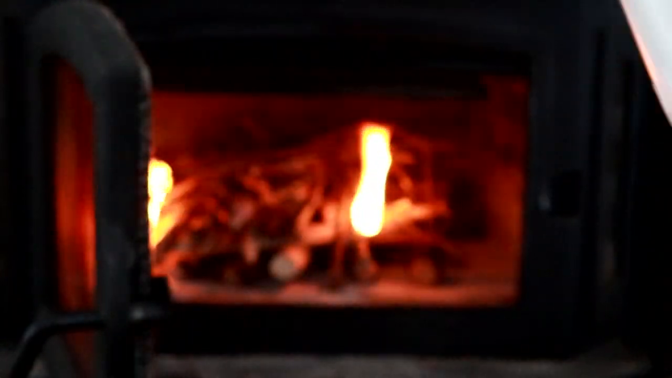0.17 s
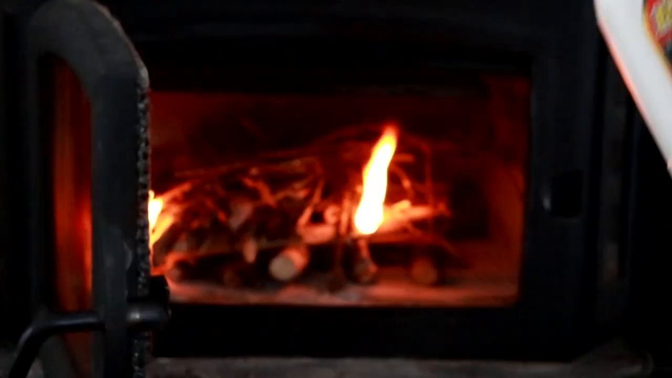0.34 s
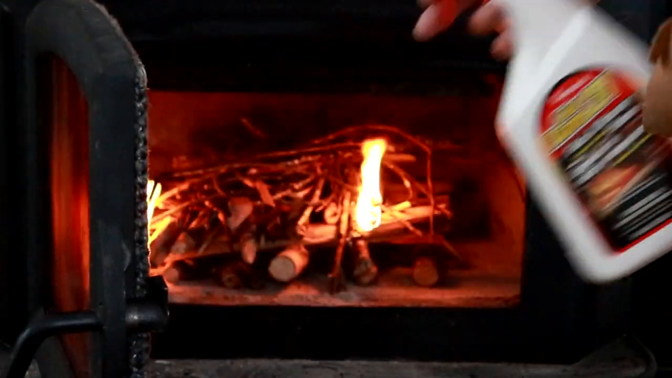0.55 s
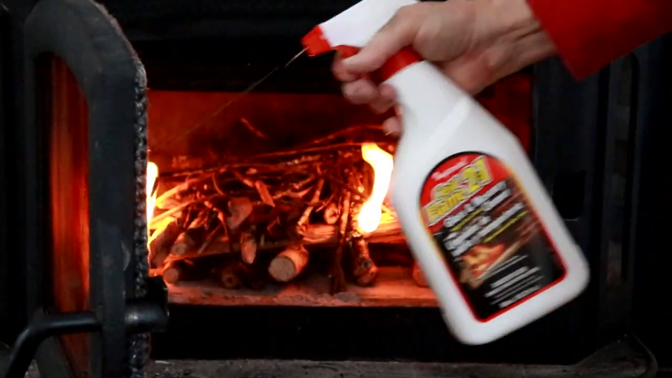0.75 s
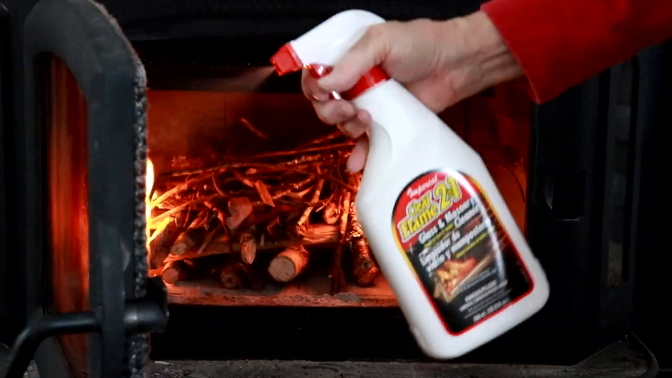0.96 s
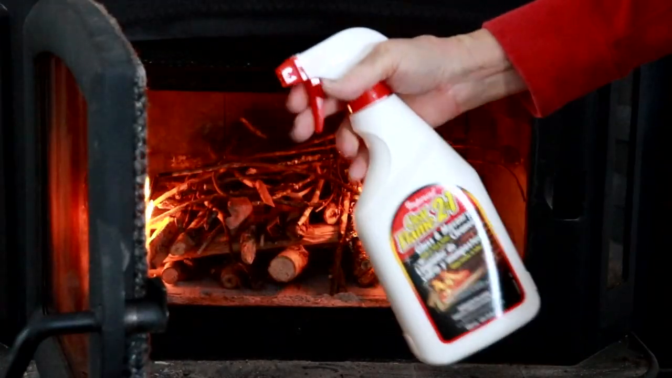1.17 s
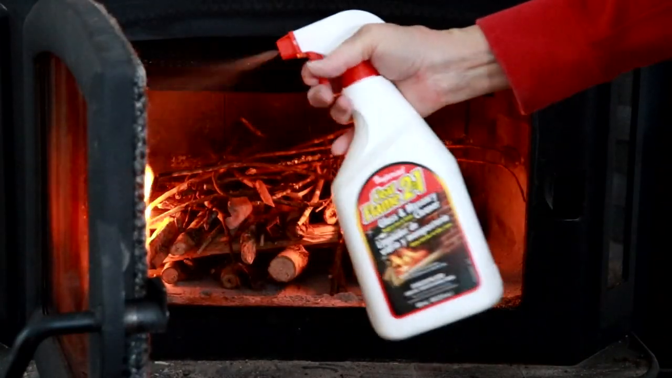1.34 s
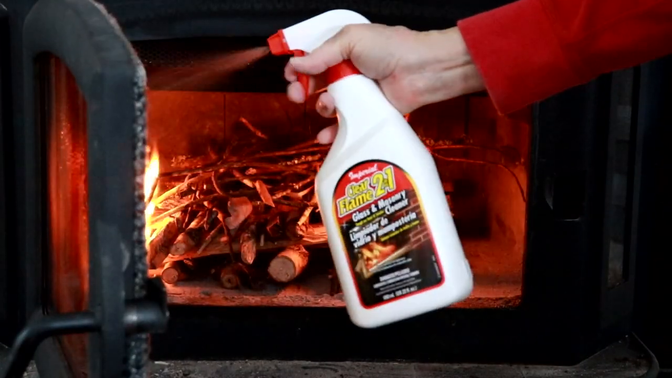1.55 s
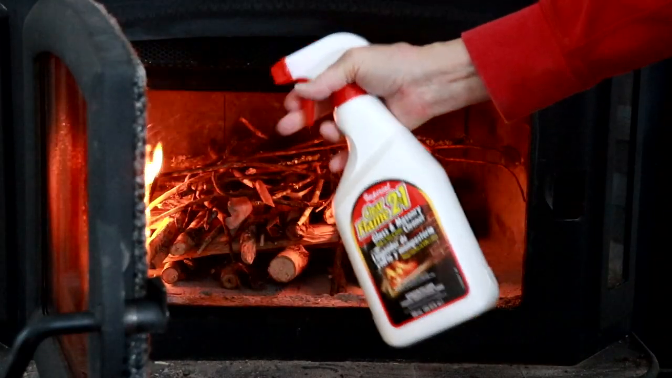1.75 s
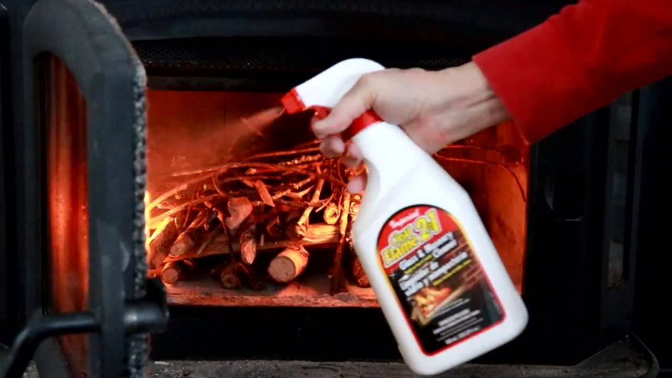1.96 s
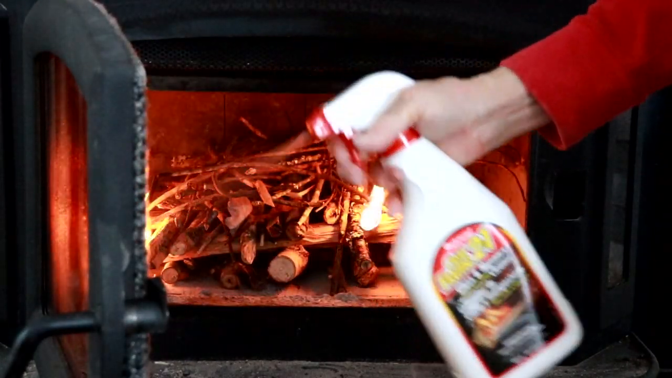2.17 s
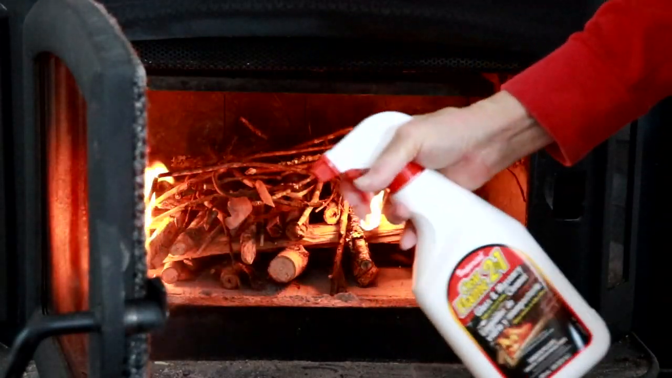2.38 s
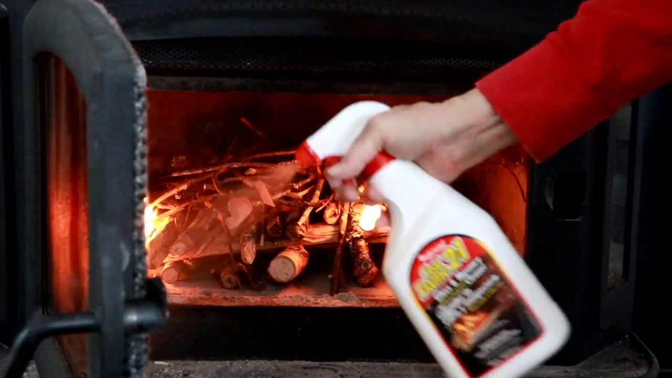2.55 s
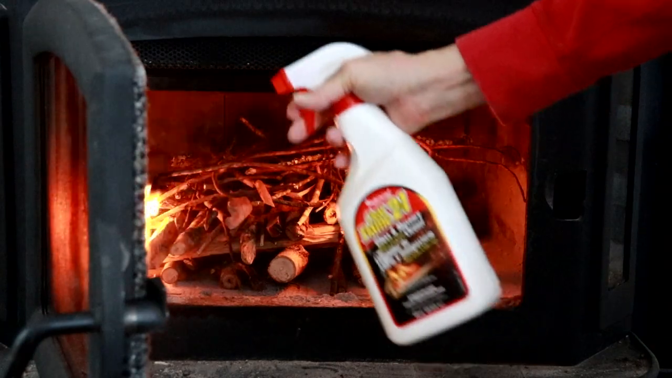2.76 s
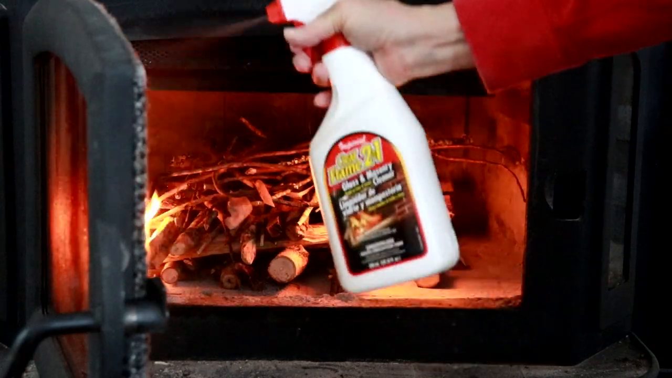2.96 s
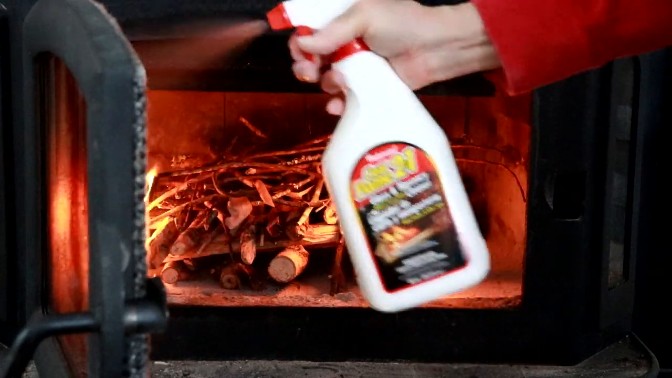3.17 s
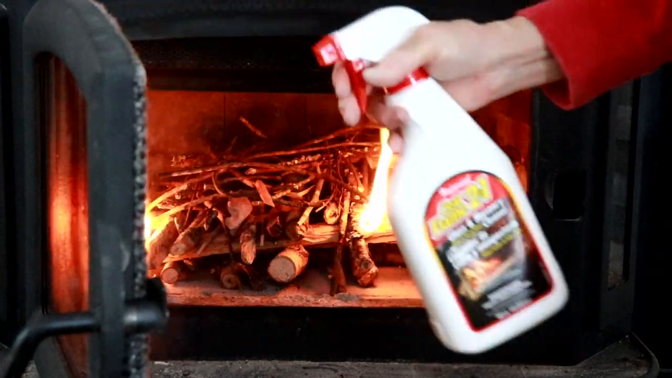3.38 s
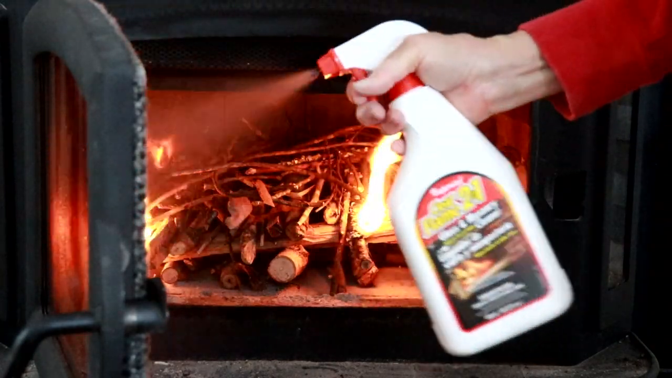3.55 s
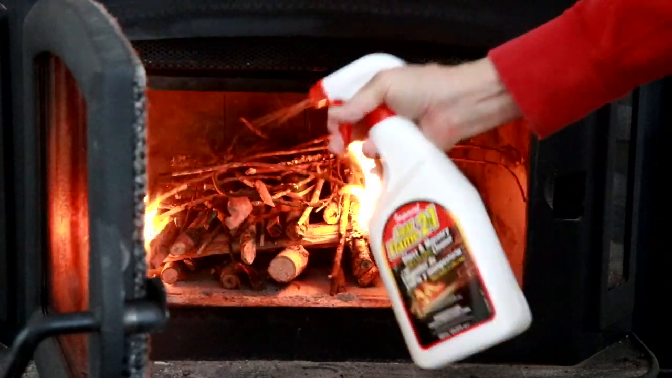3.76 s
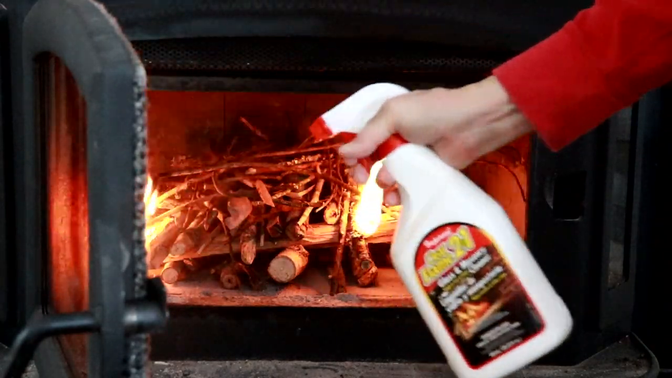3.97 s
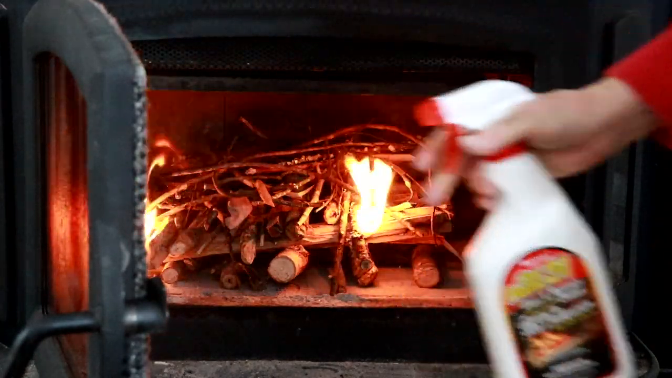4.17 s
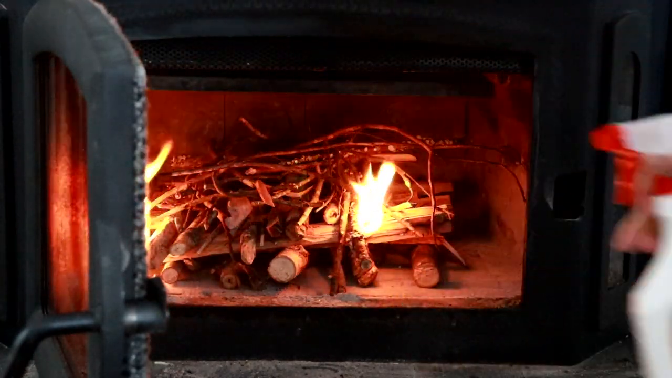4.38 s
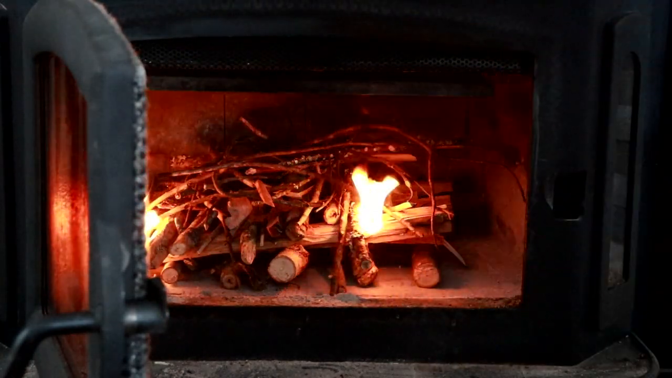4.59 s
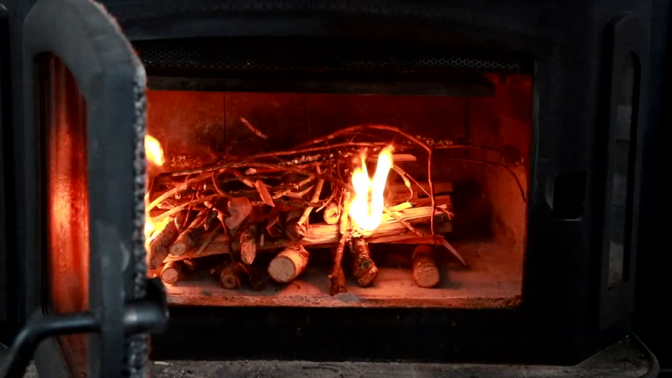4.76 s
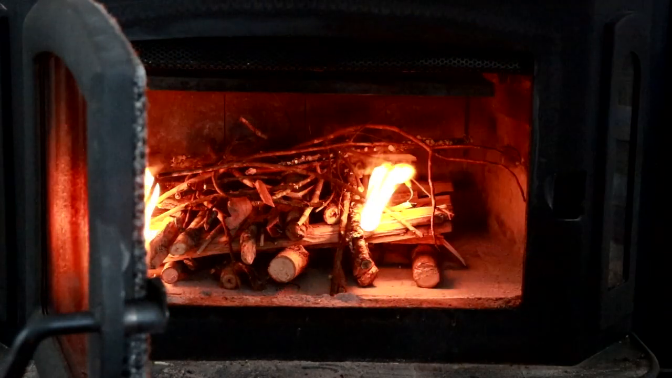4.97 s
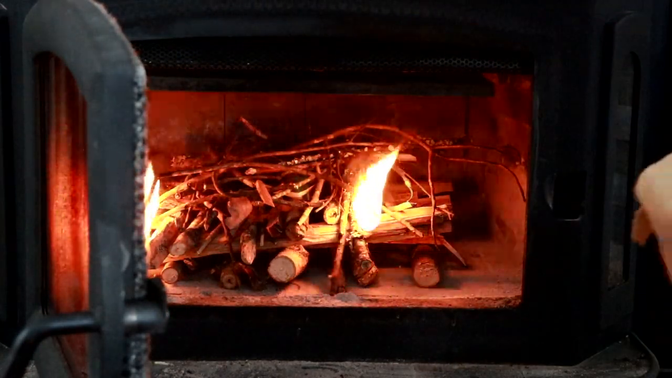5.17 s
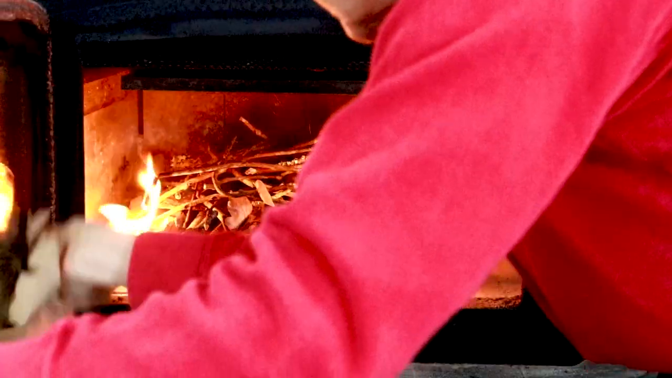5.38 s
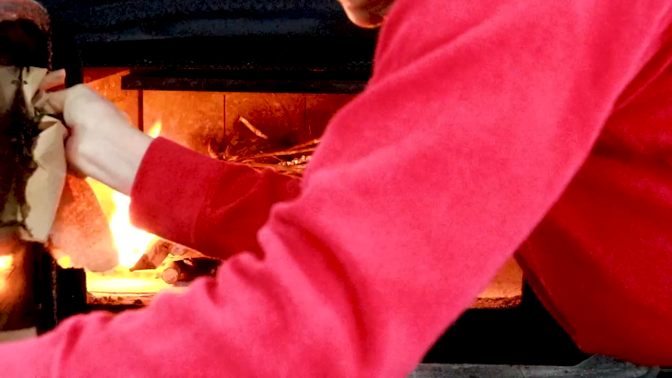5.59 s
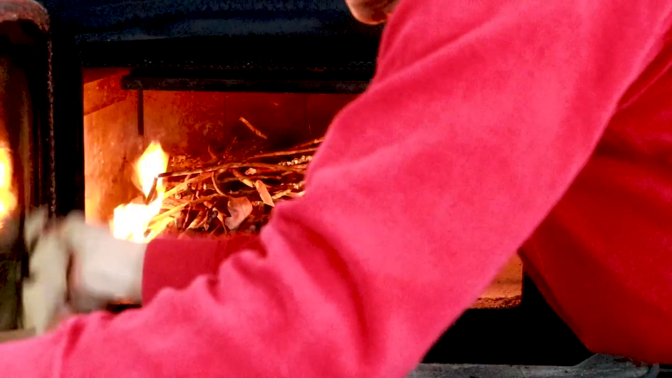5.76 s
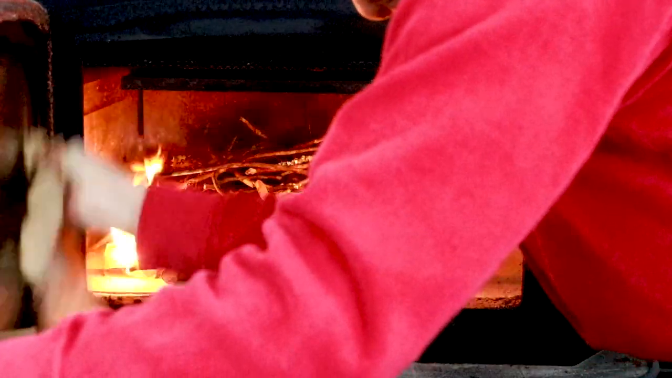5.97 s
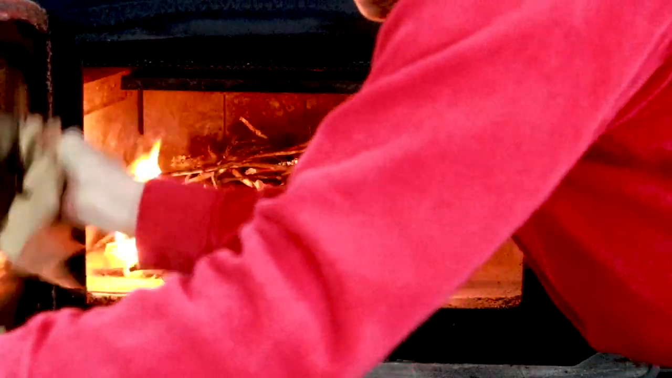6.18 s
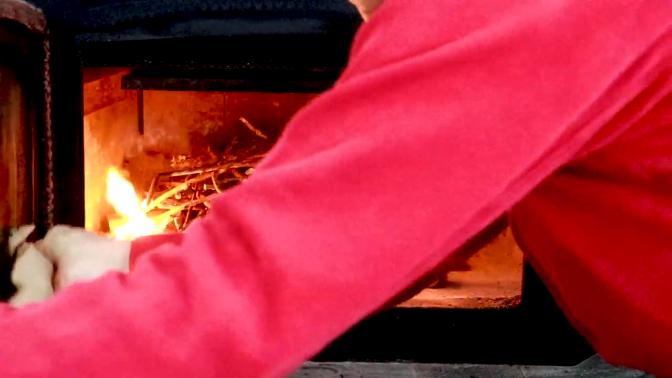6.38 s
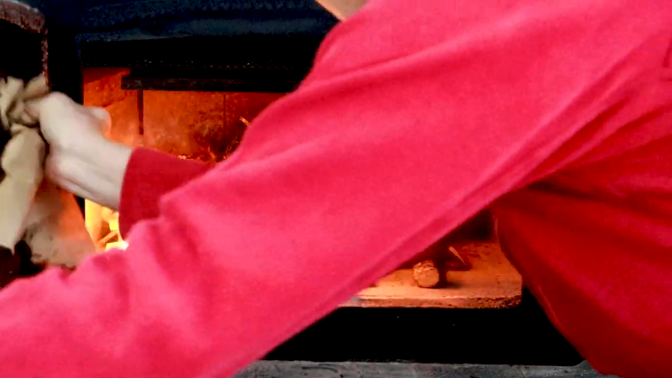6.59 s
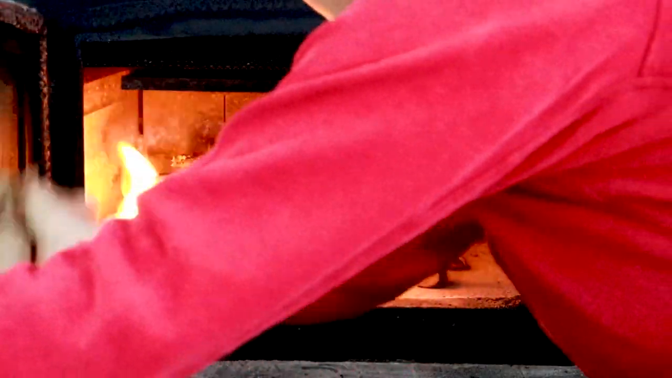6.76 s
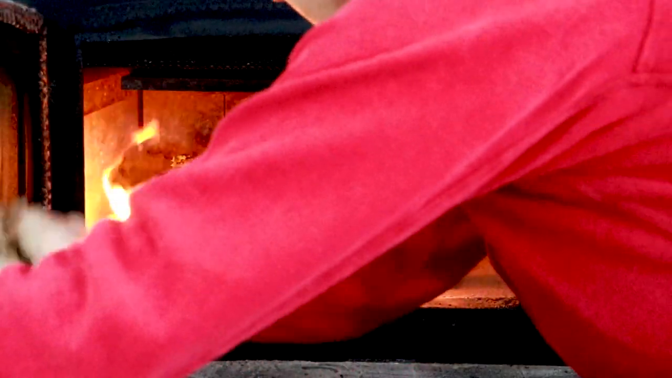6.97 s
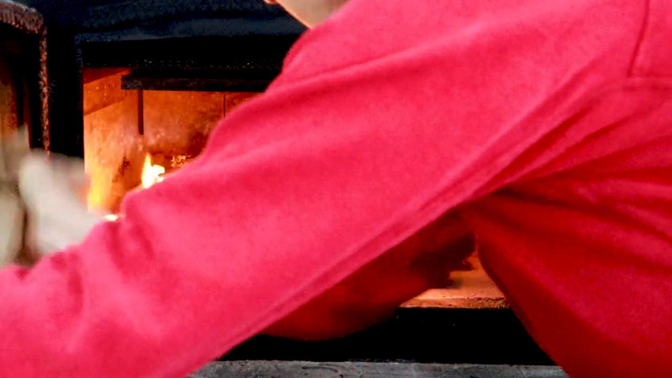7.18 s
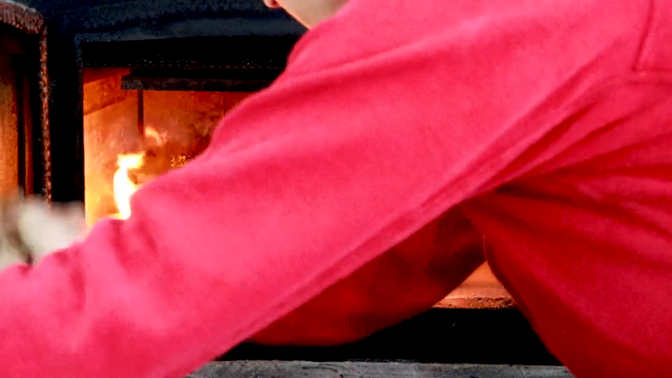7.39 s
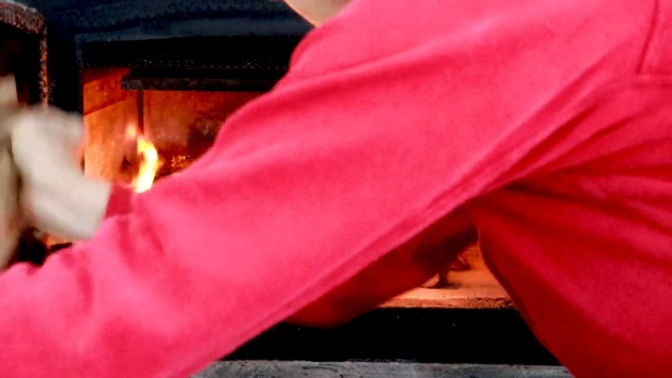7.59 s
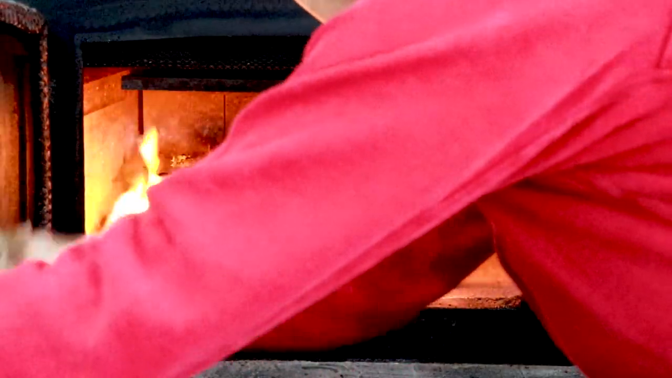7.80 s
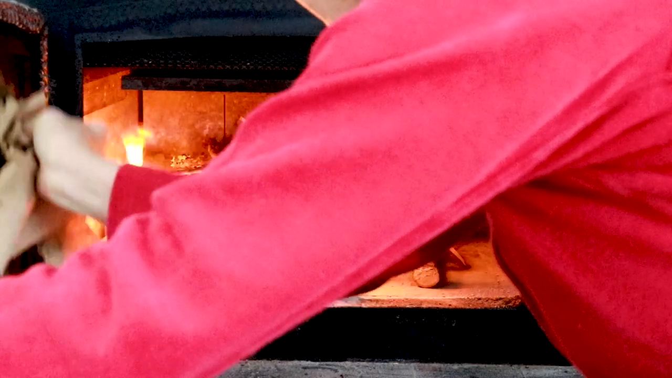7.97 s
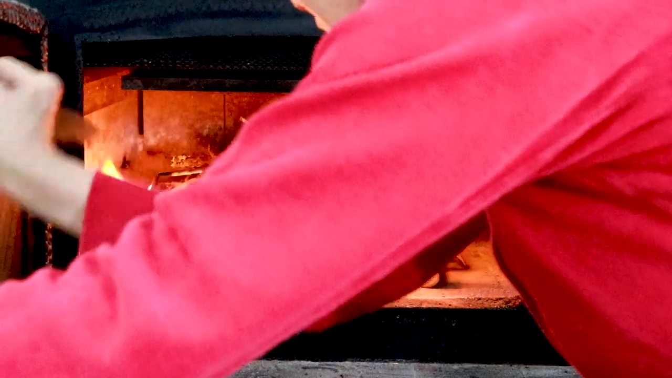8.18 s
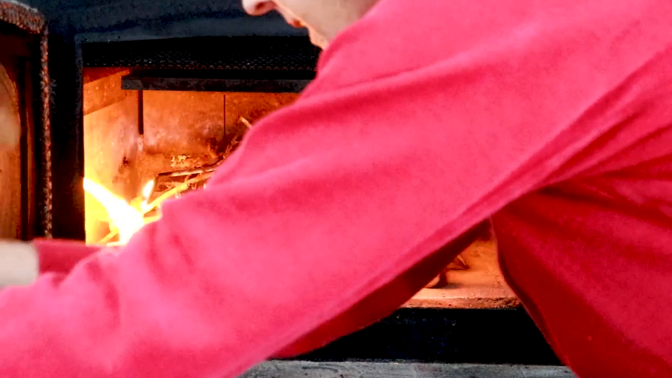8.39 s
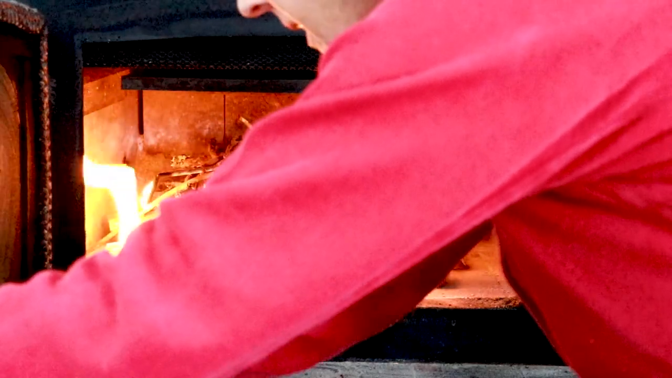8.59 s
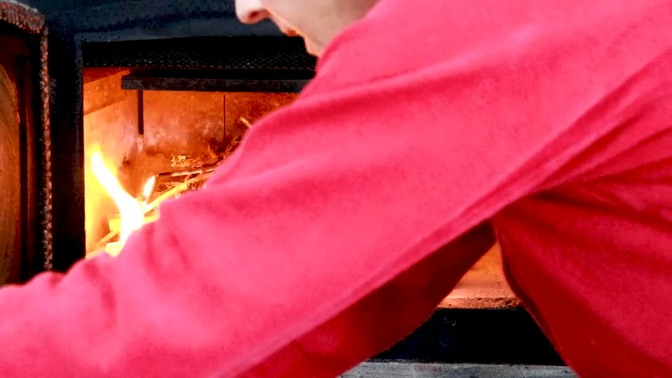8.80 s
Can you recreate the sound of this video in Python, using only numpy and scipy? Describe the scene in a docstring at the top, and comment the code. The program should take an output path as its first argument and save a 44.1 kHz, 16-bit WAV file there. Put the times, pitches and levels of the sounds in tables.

```python
"""Spraying and wiping a stove door

The glass door of a wood stove is cleaned in a small room with a soft draught and a faint hum.
A trigger bottle snaps and sputters as it primes, then gives eight puffs of mist between clicks.
Dull knocks and bumps fall early on; later a cloth rubs briskly back and forth on the wet glass.
Shaped noise makes the air, spray and rubbing; resonances colour the clicks, knocks and bottle.
"""
import sys
import numpy as np
from scipy import signal
from scipy.fft import rfft, irfft, next_fast_len
from scipy.io import wavfile
from scipy.ndimage import uniform_filter1d, map_coordinates

SR = 44100
rng = np.random.default_rng(int(sys.argv[2]) if len(sys.argv) > 2 else 0)


def wav_out(sig):
    """Save sig, one row per channel (or a flat mono array), as 16-bit PCM at SR to the path in sys.argv[1]."""
    wavfile.write(sys.argv[1], SR, np.round(np.clip(np.atleast_2d(sig).T, -1, 1) * 32767).astype(np.int16))


N = 389844
TIME = np.arange(N) / SR

# Squeezes of the trigger; click levels are before a trim:
# pulled t/s, let go t/s, pull click level/dB, its centre f/Hz, release click level/dB, mist level/dB
SQUEEZES = [(1.6238, 1.845, -24.5, 7370, -25.5, -33.5), (1.931, 2.1544, -24.5, 2320, -27, -32),
            (2.2603, 2.4906, -21, 1740, -29, -33), (2.574, 2.8, -22.5, 2520, -27, -32.5),
            (2.8944, 3.124, -22, 6860, -36.5, -33), (3.22, 3.449, -21, 6200, -31, -32.5),
            (3.53, 3.7505, -25, 1750, -28.5, -31.5), (3.863, 4.095, -19.5, 6300, -28.5, -34)]
# Resonances of the bottle's hollow body: f/Hz, width/Hz, level/dB
BOTTLE = [(1217, 40, 5.5), (1040, 250, -10.5)]


def amp(db):
    """Turn decibels into a plain factor."""
    return 10 ** (np.asarray(db) / 20)


def unit(x):
    """Scale to an average (rms) level of 1."""
    return x / np.sqrt(np.mean(x ** 2) + 1e-20)


def along(points, hz):
    """Read a curve through (f/Hz, value) points on a log frequency axis."""
    f, v = np.transpose(points)
    return np.interp(np.log(hz + 1), np.log(f + 1), v)


def wobble(rate):
    """A smooth random curve through `rate` random points a second."""
    points = rng.standard_normal(int(N * rate / SR) + 4)
    return map_coordinates(points, [TIME * rate])


def filtered(x, response):
    """Multiply the spectrum of x by a response that depends on frequency."""
    n = x.shape[-1]
    padded = next_fast_len(n + 8192)
    spectrum = rfft(x, padded) * response(np.fft.rfftfreq(padded, 1 / SR))
    return irfft(spectrum, padded)[..., :n]


def coloured(x, spectrum):
    """Shape x by a curve of (f/Hz, relative level/dB), then set it to rms 1."""
    return unit(filtered(x, lambda hz: amp(along(spectrum, hz))))


def resonance(f, hz, width):
    """One resonance, which rings only after it is struck."""
    return 1j * f * width / (hz * hz - f * f + 1j * f * width)


def resonant(x, modes, direct_db):
    """Send x through a set of resonances, beside a direct path."""
    def response(f):
        ringing = sum(amp(db) * resonance(f, hz, width) for hz, width, db in modes)
        return amp(direct_db) + ringing
    return filtered(x, response)


def add(track, s, sound):
    """Mix a sound into the track at s seconds."""
    start = round(s * SR)
    track[..., start:start + sound.shape[-1]] += sound[..., :N - start]


def pair(alike, size=N):
    """White noise at two microphones; alike is 1 for the same noise and 0 for unrelated noise."""
    mid, side = rng.standard_normal((2, size))
    turn = np.arccos(np.clip(alike, -1, 1)) / 2
    return np.cos(turn) * mid + np.sin(turn) * np.array([side, -side])


def grains(rate, spread_db, bed_db, alike):
    """Tiny impacts of uneven size, about `rate` a second, on a bed of smooth noise."""
    unevenness = np.clip(rng.standard_normal(N), -2, 2)
    sizes = (rng.random(N) < rate / SR) * amp(spread_db * unevenness)
    return unit(sizes * pair(alike)) + amp(bed_db) * pair(alike)


def patchy(x, depth_db):
    """Let the colour shift by chance over some hundred Hz and some hundredths of a second."""
    z = signal.stft(x, nperseg=512)[2]
    field = rng.standard_normal(z.shape[1:])
    field = uniform_filter1d(field, size=5, axis=0)
    field = uniform_filter1d(field, size=5, axis=1)
    shifted = z * amp(depth_db * unit(field))
    return unit(signal.istft(shifted, nperseg=512)[1][:, :N])


def placed(x, lag_ms, right_db):
    """Place a source: lag_ms delays the left against the right; right_db lifts the right over the left."""
    side = np.array([[-.5], [.5]])
    return filtered(x, lambda hz: amp(side * right_db) * np.exp(2j * np.pi * hz * side * lag_ms / 1000))


def swell(t, middle, width):
    """The bell of one push of the hand: 1 at its middle, with soft skirts."""
    return (1 + ((t - middle) / width) ** 2 / 3) ** -1.6


def swells(rows):
    """Add rows of (t/s, half-width/s, level/dB, ..) in power: one gain curve for each level column."""
    power = sum(np.outer(amp(dbs), swell(TIME, s, width)) ** 2 for s, width, *dbs in rows)
    return np.sqrt(power)


def gate(start, edge):
    """A soft step from 0 to 1, halfway up at the start time."""
    return .5 + .5 * np.tanh((TIME - start) / edge)


def background():
    """The room's air and the stove's draught as noise more alike in the bass, with a faint wavering hum."""
    # Room and draught: f/Hz, relative level/dB per Hz
    air_colour = [(15, -49), (25, -24), (55, -4), (190, -7), (394, -7.5), (463, -6), (503, -5.5), (624, -7),
                  (714, -8.5), (1040, -7), (1790, -9), (1940, -9), (8140, -15), (16000, -24)]
    # Hum tones: f/Hz, level/dB
    hum_tones = [(59.5, -69), (274, -73.5)]
    noise = filtered(pair(0.86), lambda hz: along([(200, 0.72), (1500, 0.59), (4000, 0.1)], hz))
    noise += filtered(pair(0), lambda hz: along([(200, 0.68), (1500, 0.8), (4000, 0.96)], hz))
    hum = 0
    for hz, db in hum_tones:
        tone = np.sin(2 * np.pi * hz * TIME + 0.6 * wobble(2))
        hum = hum + amp(db) * unit(tone)
    air_db = -50.0
    return amp(air_db) * coloured(noise, air_colour) + hum


def room(x):
    """The walls answer with a short tail that dies fastest in the treble."""
    # Reverberation: f/Hz, time to fall by 60 dB t60/s
    fade_times = [(150, 0.69), (1500, 0.5), (6000, 0.3), (15000, 0.084)]
    hz, t, z = signal.stft(rng.standard_normal((2, SR // 2)), SR, nperseg=256)
    fade = amp(-60 * t / along(fade_times, hz)[:, None])
    tail = signal.istft(z * fade, SR, nperseg=256)[1]
    # the answer starts 1/300 s after the sound
    tail = np.pad(tail / np.linalg.norm(tail[0]), ((0, 0), (SR // 300, 0)))
    return signal.fftconvolve(x, tail, axes=1)[:, :N]


def knocks(thud_db=-8, push=18, shudder_s=0.067):
    """Soft heavy contacts: a push and a dull rattle through low resonances, and a slow shudder."""
    # Dull knocks and handling bumps; the knock level is before thud_db:
    # t/s, knock level/dB, low shudder level/dB, brightness/dB per octave, rattle t60/s
    bumps = [(0.244, -40.5, -73, 2, 0.63), (0.379, -39, -70, 1, 0.4), (.506, -28, -47, -4, 0.24),
             (.692, -36, -57, 3, 0.35), (.977, -20, -49, 0, 0.37)]
    # Low resonances: f/Hz, width/Hz, level/dB
    thud_modes = [(145, 44, -1.5), (225, 31, -2), (263, 55, 2.5), (320, 59, -7), (487, 150, -5),
                  (695, 87, -15), (910, 160, -12)]
    out = np.zeros((2, N))
    t = np.arange(SR // 2) / SR
    band = signal.butter(2, [110, 1400], "band", fs=SR, output="sos")
    for s, db, shudder_db, tilt_db, t60 in bumps:
        rattle = pair(0.93, size=len(t)) * amp(-60 * t / t60)
        blow = rattle + push * (t == 0)
        body = signal.sosfilt(band, resonant(blow, thud_modes, direct_db=-14))
        body = filtered(body, lambda f: amp(tilt_db * np.log2(np.clip(f, 100, 1500) / 350)))
        body /= np.sqrt(np.mean(body[:, :SR // 50] ** 2))  # rms 1 over the first 20 ms
        shudder = coloured(pair(0.99, size=len(t)),
                           [(10, -18), (30, -7), (80, -4), (200, -11), (800, -70)])
        sway = t / shudder_s * np.exp((1 - (t / shudder_s) ** 2) / 2)
        add(out, s, amp(db + thud_db) * body + amp(shudder_db) * shudder * sway)
    return out


def sleeve():
    """A sleeve rustles as the bottle is raised and taken away, and as the arm reaches in with the cloth."""
    # Moves of the arm: fastest at t/s, half-width/s, level/dB
    arm_moves = [(.15, 0.13, -44), (.42, 0.028, -49.5), (.655, 0.056, -45), (4.18, 0.031, -55),
                 (4.41, .075, -52.5), (5.2, 0.17, -54)]
    rustle = coloured(grains(rate=3100, spread_db=5.5, bed_db=0.5, alike=0.13),
                      [(300, -6), (1400, 1.5), (3500, 0.0), (8000, -6.0), (15500, -17.5)])
    return placed(swells(arm_moves)[0] * rustle, lag_ms=0.32, right_db=5.5)


def wiping():
    """Gains of rub, hiss and rumble: strokes swell or dip midway between turns, over a steady creep."""
    # Strokes of the cloth: start t/s, end t/s, middle above the turns/dB (negative: below),
    # then before later trims: damp rub level/dB, dry fibre hiss level/dB, pane rumble level/dB
    strokes = [(5.285, 5.433, -1.5, -48, -56, -53.5), (5.475, 5.735, 13.5, -32.5, -36, -47.5),
               (5.746, 5.929, -0.5, -42.5, -49.5, -51), (6.056, 6.185, 8, -38, -44, -62),
               (6.196, 6.303, -2, -45, -56, -58), (6.3, 6.439, 7, -39.5, -44.5, -52),
               (6.515, 6.767, 15, -34, -38.5, -46.5), (6.771, 6.967, 2, -42, -46, -50.5),
               (6.98, 7.17, -2.5, -54, -57, -65), (7.293, 7.453, 7, -46, -51, -57),
               (7.484, 7.57, 0, -54, -54.5, -52), (7.776, 8.002, -0.5, -51, -54, -59.5),
               (8.003, 8.127, 5.5, -38, -41, -61), (8.166, 8.272, 3, -44, -44.5, -64),
               (8.27, 8.48, 4, -67, -46.5, -59), (8.54, 8.743, 1.5, -45, -44, -57.5),
               (8.79, 8.87, 4, -45, -49, -68)]
    # The hand leans on the door and the pane thumps: t/s, half-width/s, level/dB
    leans = [(5.53, .012, -48), (6.525, 0.026, -50), (6.81, 0.035, -47.5), (8.105, .01, -51)]
    turn_s = 0.021  # the hand takes up or gives up a stroke within about this time
    roundness = 1.36  # top of a stroke's swell: 1 pointed, 2 round
    creep_db = [-53, -61.5, -61]  # rub, hiss and rumble as the cloth keeps creeping
    power = np.outer(amp(creep_db), gate(strokes[0][0], turn_s)) ** 2
    for start, end, swell_db, *dbs in strokes:
        place = np.clip(2 * (TIME - start) / (end - start) - 1, -1, 1)  # 0 at mid-stroke
        moving = gate(start, turn_s) * (1 - gate(end, turn_s))
        speed_gain = amp(-swell_db * np.abs(place) ** roundness)
        power += np.outer(amp(dbs), speed_gain) ** 2 * moving
    rub, hiss, press = np.sqrt(power)
    return rub, hiss, np.hypot(press, swells(leans)[0])


def cloth(damp_share=0.43):
    """Fibres stick and slip on the glass; pressure makes the pane rumble, and folds of cloth catch."""
    # Colours of the damp rub, swish, dry fibres and pane: f/Hz, relative level/dB per Hz
    rub_colour = [(250, -35), (450, -22), (700, -10.5), (1000, -5), (1500, -1.5), (2000, -1), (2700, -2.5),
                  (3500, -7.5), (6000, -6), (9000, -17), (15000, -49)]
    swish_colour = [(1500, -37), (2800, 2), (4000, 2), (5500, -1.5), (8000, -3.5), (12000, -52)]
    fibre_colour = [(2500, -9.5), (4500, -18), (8000, -1.5), (11000, -3.5), (15500, -14.5)]
    pane_colour = [(35, -36), (70, -14), (200, -7), (450, -3.5), (700, -3), (1100, -20)]
    # Resonances of the pane in its frame: f/Hz, width/Hz, level/dB
    glass_modes = [(277.5, 18, 3.5), (425, 19, -8)]
    # Folds catch and slap the glass: t/s, level/dB before a trim, centre f/Hz, t60/s
    catches = [(5.279, -28, 2390, 0.074), (5.555, -23, 1810, .17), (6.781, -22, 8000, 0.12),
               (6.836, -23, 2000, .12), (6.944, -28, 2250, 0.25), (7.02, -26.5, 2030, 0.13),
               (7.411, -33, 6000, 0.042), (7.548, -23.5, 1700, .04), (7.826, -27.5, 1790, .16),
               (7.848, -23, 1670, .12), (8.19, -27, 7000, 0.11), (8.543, -28, 9500, 0.18),
               (8.81, -28, 1800, .09)]

    def slips(alike):
        """Many small slips of the fibres, with a shifting colour."""
        return patchy(grains(rate=1800, spread_db=-4, bed_db=5.0, alike=alike), depth_db=2)

    rub, hiss, press = wiping()
    grip = amp(0.42 * wobble(130) + 1.33 * wobble(35))
    out = rub * grip * amp(1.0) * coloured(slips(0.92), rub_colour)
    # the level of the weave's swish lies between the damp rub and the hiss of dry fibres
    weave = rub ** damp_share * hiss ** (1 - damp_share)
    out += weave * grip * amp(1.0) * coloured(slips(0.06), swish_colour)
    out += hiss * grip * amp(-1) * coloured(slips(0.18), fibre_colour)
    rumble = resonant(pair(1.0), glass_modes, direct_db=-4.0)
    out += press * amp(-0.5) * coloured(rumble, pane_colour)
    t = np.arange(SR // 4) / SR
    for s, db, hz, t60 in catches:
        scuff = unit(filtered(pair(0.49, size=len(t)), lambda f: resonance(f, hz, hz) ** 2))
        fade = amp(db - 11.5 - 60 * t / t60) * (1 - np.exp(-t / 0.0015))
        add(out, s, scuff * fade)
    return placed(out, lag_ms=-0.06, right_db=0.25)


def click(db, hz, crack_t60=0.0077, rattle_db=-20, rattle_t60=0.13):
    """A plastic snap: a short crack and a faint rattle through the head, too small to radiate bass."""
    # Resonances of the plastic spray head: f/Hz, width/Hz, level/dB
    head_modes = [(2950, 1200, 11.5), (4330, 1100, 5.5), (5750, 1500, 8.5), (7000, 600, 9)]
    t = np.arange(SR // 8) / SR
    fade = amp(-60 * t / crack_t60) + amp(rattle_db - 60 * t / rattle_t60)
    crack = fade * pair(0.8, size=len(t))
    head = resonant(crack, head_modes, direct_db=-5)
    snap = filtered(head, lambda f: resonance(f, hz, 1.3 * hz))
    snap = signal.sosfilt(signal.butter(3, 650, "high", fs=SR, output="sos"), snap)
    return amp(db) * snap / np.sqrt(np.mean(snap[:, :SR // 400] ** 2))  # level over the first 2.5 ms


def trigger(hollow_t60=0.12):
    """The trigger clicks when pulled and snaps back when let go; stiff early snaps ring the bottle."""
    # Snaps of the stiff trigger and its spring:
    # t/s, level/dB before a trim, centre f/Hz, hollow ring of the bottle level/dB
    snaps = [(0.7272, -26, 9000, -60), (0.8823, -16.5, 4700, -36), (0.9212, -34, 1350, -34.5),
             (1.2686, -3, 6200, -26.5), (1.515, -34, 7430, -51), (1.5312, -24.5, 4620, -44.5),
             (1.562, -29.5, 4000, -48), (2.2256, -34, 3220, -65)]
    release_hz = 6200  # centre of the click as the trigger springs back
    out = np.zeros((2, N))
    t = np.arange(SR // 4) / SR
    for s, db, hz, hollow_db in snaps:
        add(out, s, click(db - 7.5, hz))
        hollow = resonant(pair(1.0, size=len(t)), BOTTLE, direct_db=-40)
        hollow = filtered(hollow, lambda f: resonance(f, 800, 700))
        fade = amp(hollow_db - 60 * t / hollow_t60) * (1 - np.exp(-t / 0.00062))
        add(out, s, unit(hollow) * fade)
    for pulled, let_go, pull_db, pull_hz, release_db, _ in SQUEEZES:
        add(out, pulled, click(pull_db - 10.0, pull_hz))
        add(out, let_go, click(release_db - 5.5, release_hz))
    return placed(out, lag_ms=-0.0036, right_db=2.0)


def priming():
    """Gains of liquid and air: the valve opens quickly, and each spit swells and dies."""
    # Spits while the pump primes: start t/s, fullest t/s, half-width/s, liquid level/dB, air level/dB
    spits = [(0.727, 0.752, 0.032, -31, -35), (.98, 1.091, 0.0074, -15, -33.5),
             (0.967, 1.106, 0.037, -25, -34.5), (1.316, 1.336, 0.017, -31, -44),
             (1.318, 1.382, 0.071, -54, -32.5), (1.627, 1.664, 0.015, -36, -50)]
    opens_s = 0.0058  # the valve opens within about this time
    gains = []
    for start, s, width, *dbs in spits:
        gains.append(np.outer(amp(dbs), gate(start, opens_s) * swell(TIME, s, width)))
    return np.linalg.norm(gains, axis=0)


def sputter():
    """Bubbles burst in the nozzle and ring its cavities as the pump primes; air is sucked back in between."""
    # Cavities of the nozzle: f/Hz, width/Hz, level/dB
    cavities = [(4440, 63, -3), (6300, 33, 4), (7020, 37, 2), (7760, 34, 5), (8100, 50, -5), (9189, 50, -7),
                (10400, 60, -2), (11000, 60, 0), (10900, 60, -8), (11600, 50, -2), (11885, 60, -5),
                (14300, 60, -4), (14245, 60, -8)]
    # Colours of wet spit, airy hiss and sucked air: f/Hz, relative level/dB per Hz
    spit_colour = [(1000, -45), (1750, -7), (2300, -19), (3900, -4), (4600, -1), (6000, 1), (8700, 0),
                   (14500, 0.5), (16000, -4.5)]
    hiss_colour = [(250, -35), (450, -9.5), (900, -3), (1500, -4), (2600, -0.5), (7000, -3.5), (11000, -6),
                   (16000, -4)]
    suck_colour = [(300, -9), (900, -7), (1600, -5.5), (3000, -0.5), (5500, 4), (8000, -4), (10500, -19),
                   (15000, -28)]
    # The pump sucks air back: fullest t/s, half-width/s, level/dB
    intakes = [(1.21, 0.024, -35.5), (1.298, 0.014, -41)]
    spit, hiss = priming()
    bursts = grains(rate=4600, spread_db=4, bed_db=2.5, alike=0.77)
    wet = spit * coloured(resonant(bursts, cavities, direct_db=-4), spit_colour)
    puffs = grains(rate=2000, spread_db=1.5, bed_db=1.5, alike=0.65)
    airy = hiss * coloured(resonant(puffs, [(1150, 110, -1)], direct_db=2), hiss_colour)
    breath = resonant(pair(0.74), BOTTLE, direct_db=-6)
    sucked = swells(intakes)[0] * coloured(breath, suck_colour)
    return placed(wet + airy + sucked, lag_ms=-0.015, right_db=1.0)


def mist(spurt_db=-5, spurt_s=0.0057, fizz_db=-10):
    """Each squeeze spurts, then swells with the pump pressure; at low pressure the nozzle fizzes."""
    # Colour of the fine mist: f/Hz, relative level/dB per Hz
    mist_colour = [(120, -48), (200, -15.5), (236, -33), (263, -23), (347, -16.5), (519, -7.5),
                   (635, -11.5), (916, -3), (1140, -2.5), (2560, -3), (7680, -7.5), (15100, -16),
                   (16000, -33)]
    fullest_share, width_s = 0.45, 0.039  # flow is fullest at this share of a squeeze; half-width of swell
    flow, spurt, fizz = np.zeros((3, N))
    t = np.arange(SR // 2) / SR
    for s, let_go, *_, db in SQUEEZES:
        delay = fullest_share * (let_go - s)
        pressure = swell(t, delay, width_s) * (1 - np.exp(-t / 0.016))
        # fizz near the start and the end of the puff
        ends = np.exp(-((t - .018) / 0.017) ** 2)
        ends += 0.62 * np.exp(-((t - 1.78 * delay) / 0.013) ** 2)
        add(flow, s, amp(db) * pressure)
        add(spurt, s, amp(db + spurt_db) * t / spurt_s * np.exp(1 - t / spurt_s))
        add(fizz, s, amp(db + fizz_db) * ends)
    droplets = grains(rate=8000, spread_db=-0.5, bed_db=6.5, alike=0.8)
    fine = coloured(patchy(droplets, depth_db=1.6), mist_colour)
    coarse = coloured(grains(rate=1500, spread_db=4.0, bed_db=0.0, alike=1.0),
                      [(90, -28), (220, 6.0), (500, -4.5), (1000, 6.5), (2000, 2.5),
                       (3000, -1.5), (7000, -3.5), (15000, -27)])
    thin = unit(filtered(pair(.6), lambda f: resonance(f, 12900, 5200) ** 2))
    return placed(flow * fine + spurt * coarse + fizz * thin, lag_ms=-0.016, right_db=1.1)


def scene():
    """Add all the sources; the room faintly answers the clicks, spray and rubbing."""
    clicks = trigger()
    spray = sputter() + mist()
    rubbing = cloth() + sleeve()
    echo = room(amp(-8.0) * clicks + amp(-10.0) * spray + amp(-12.5) * rubbing)
    return clicks + spray + rubbing + knocks() + echo + background()


def record(dry):
    """Clip at full scale, then keep nothing above the band limit."""
    top_hz = 15850
    return filtered(np.clip(dry, -1, 1), lambda hz: hz < top_hz)


dry = scene()
out = record(dry)
wav_out(out)
```